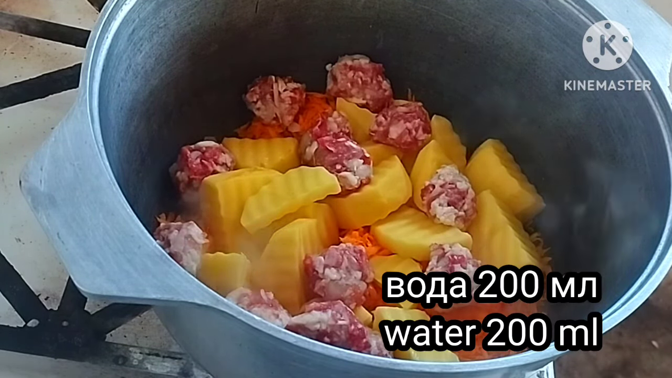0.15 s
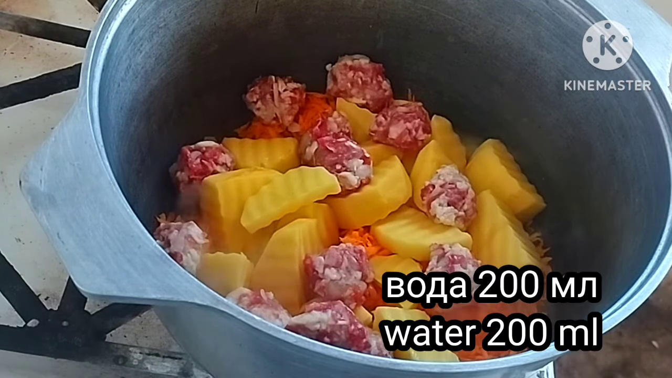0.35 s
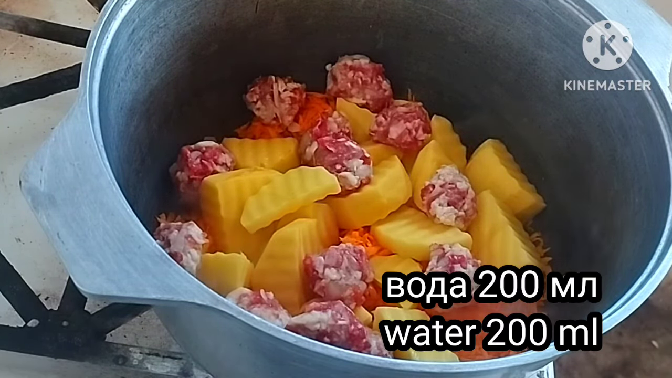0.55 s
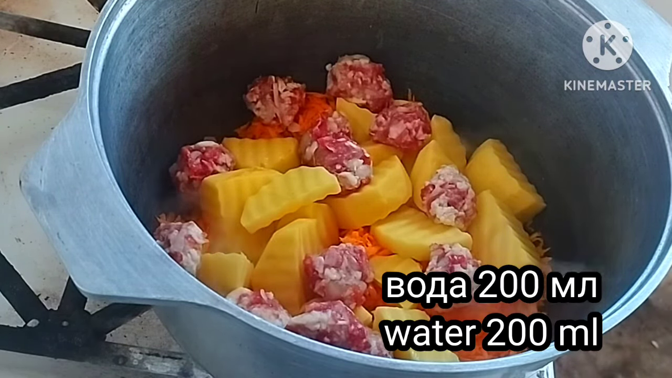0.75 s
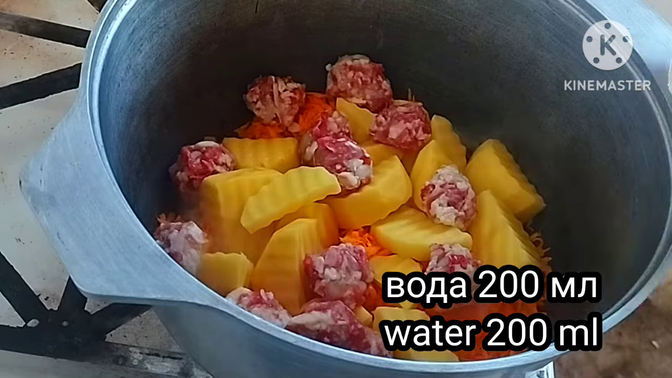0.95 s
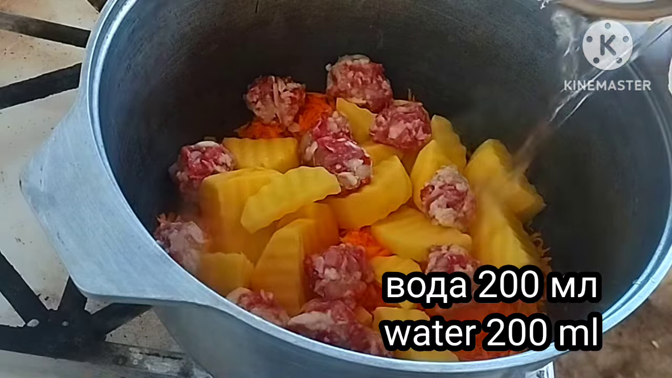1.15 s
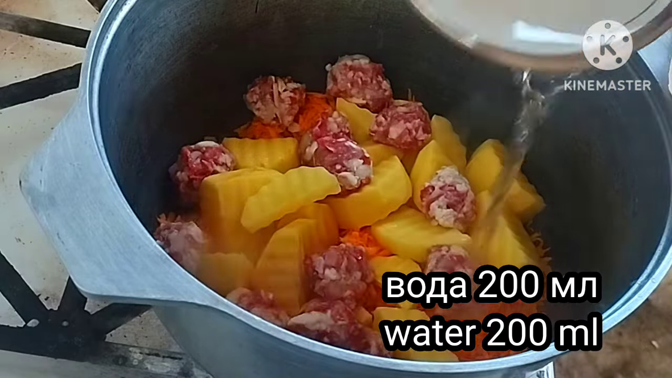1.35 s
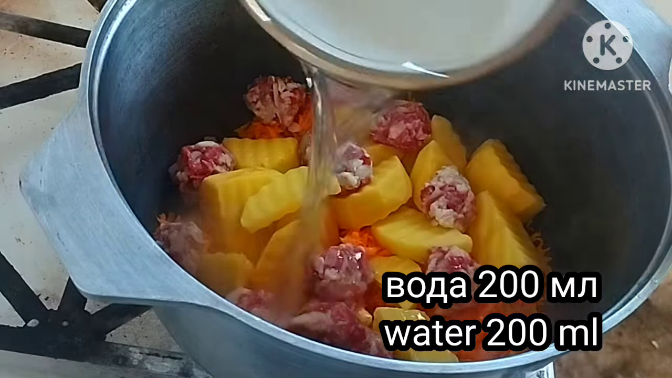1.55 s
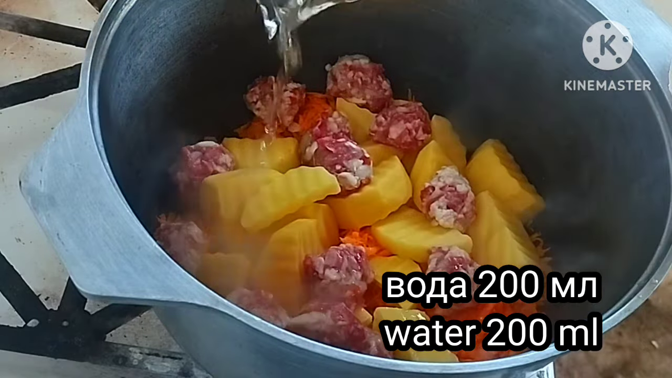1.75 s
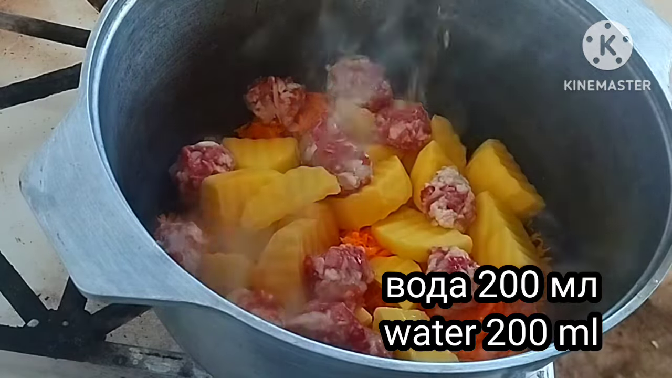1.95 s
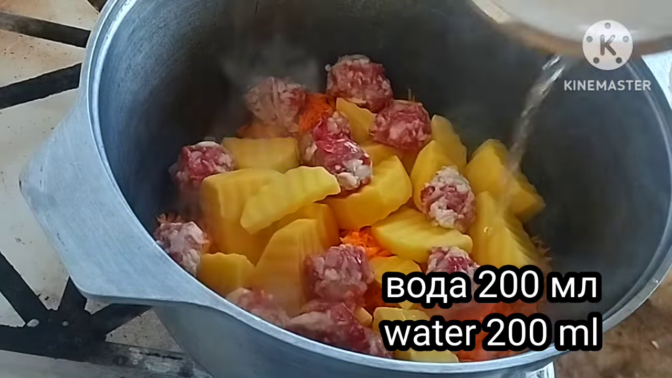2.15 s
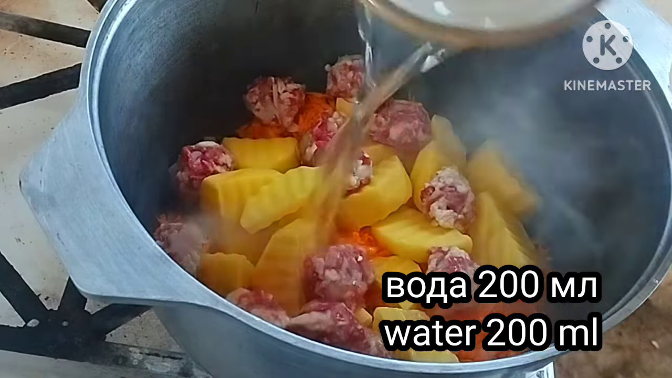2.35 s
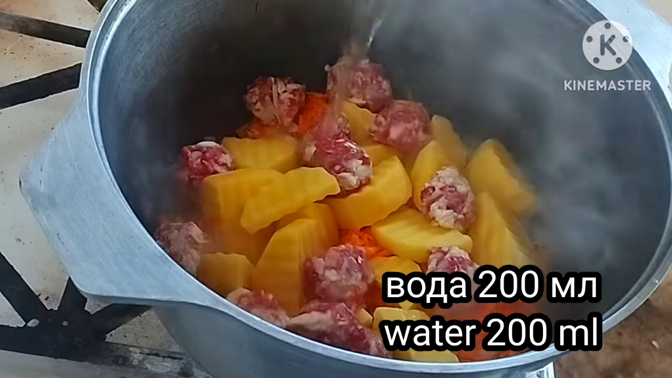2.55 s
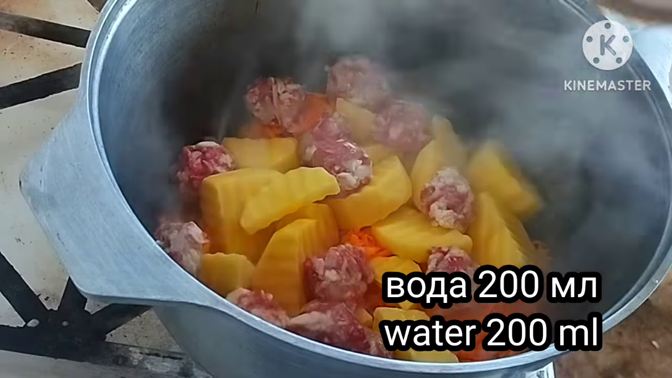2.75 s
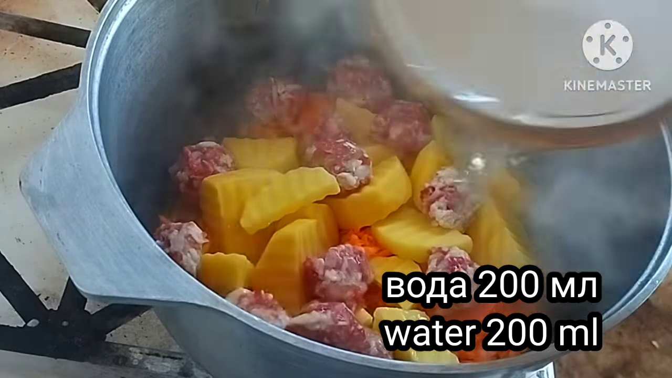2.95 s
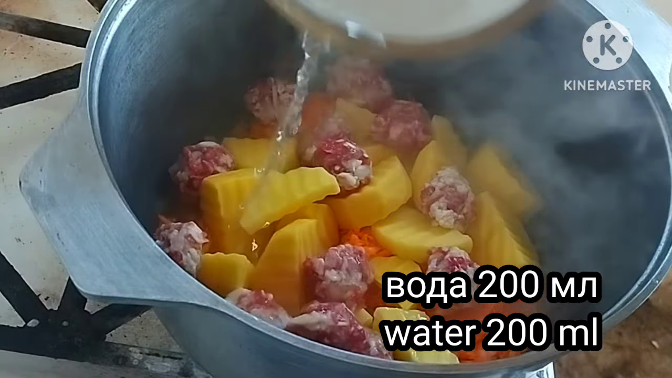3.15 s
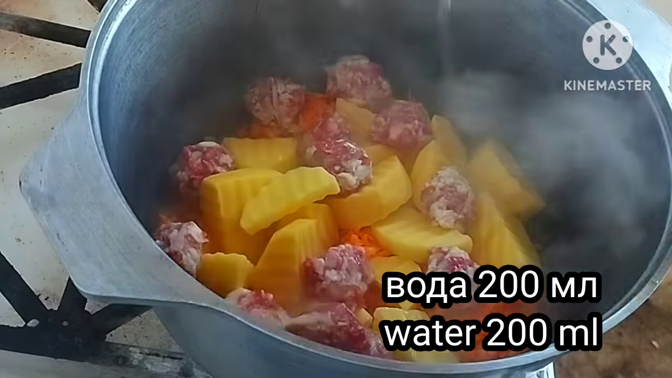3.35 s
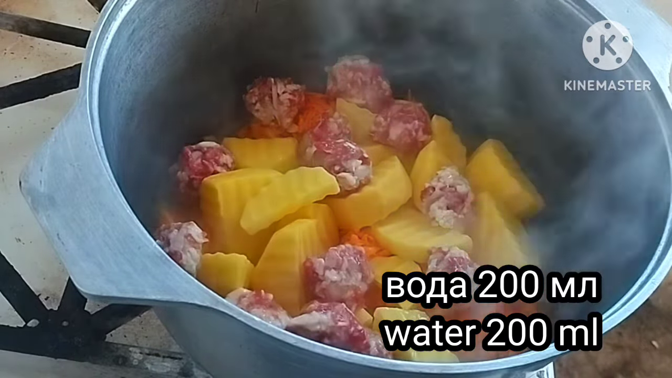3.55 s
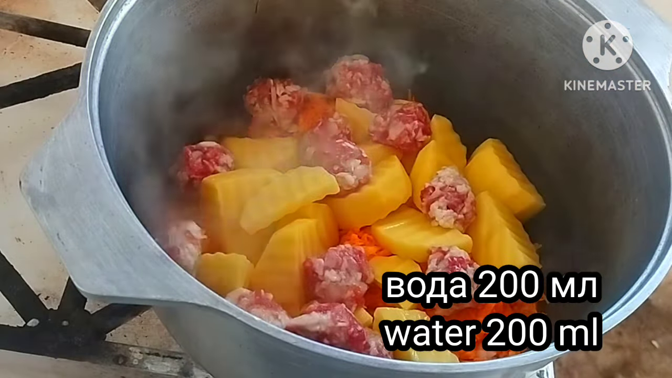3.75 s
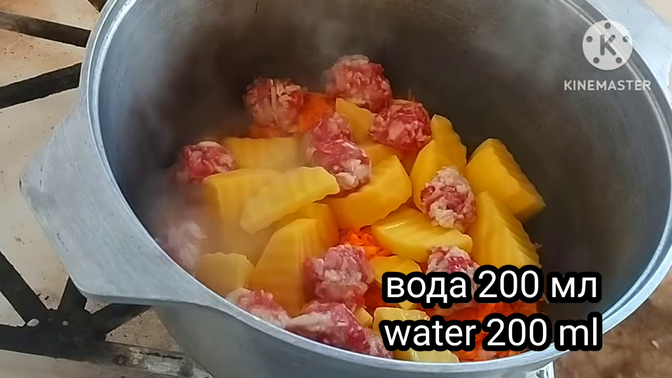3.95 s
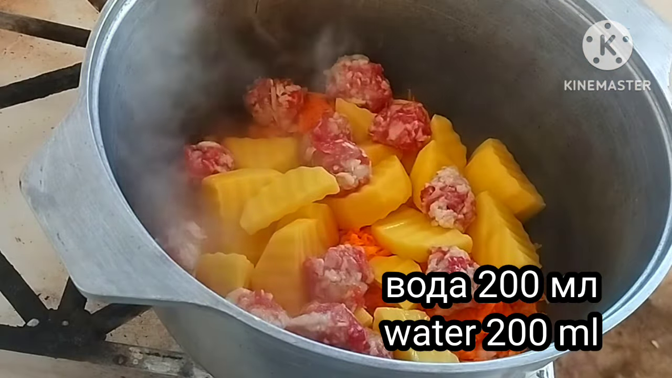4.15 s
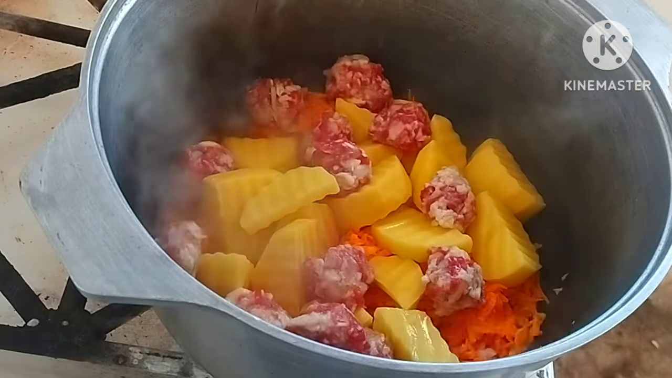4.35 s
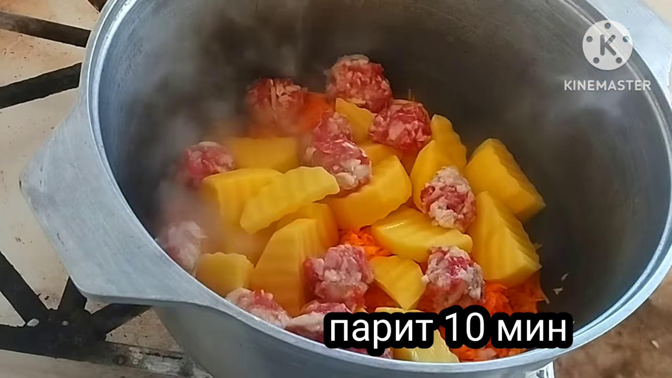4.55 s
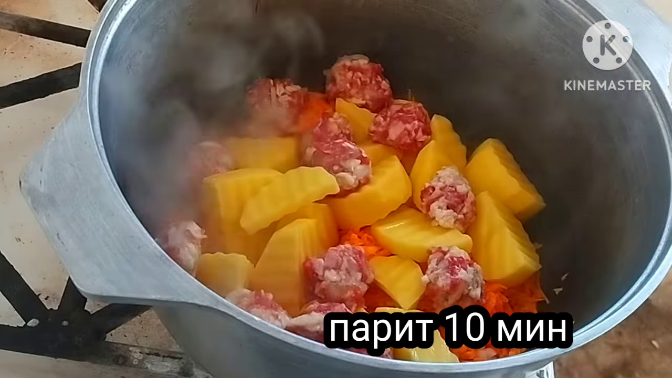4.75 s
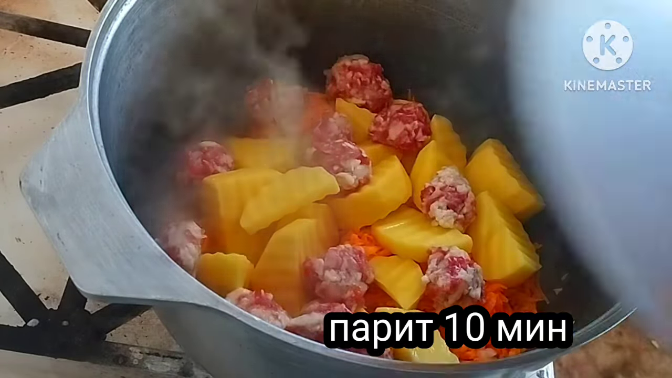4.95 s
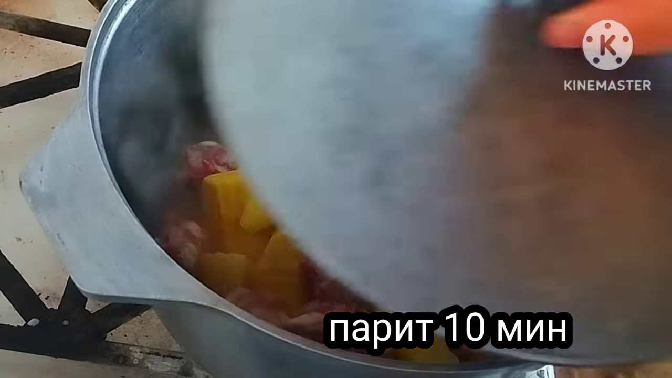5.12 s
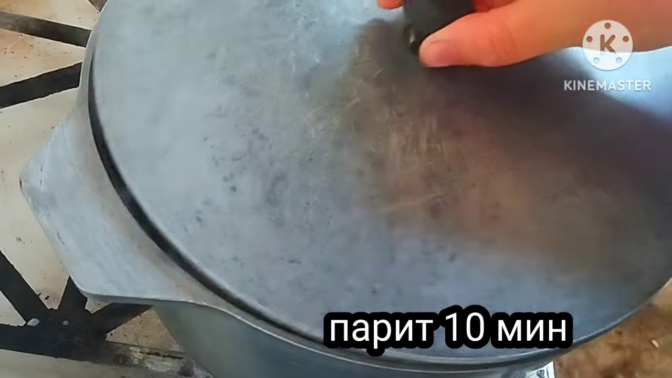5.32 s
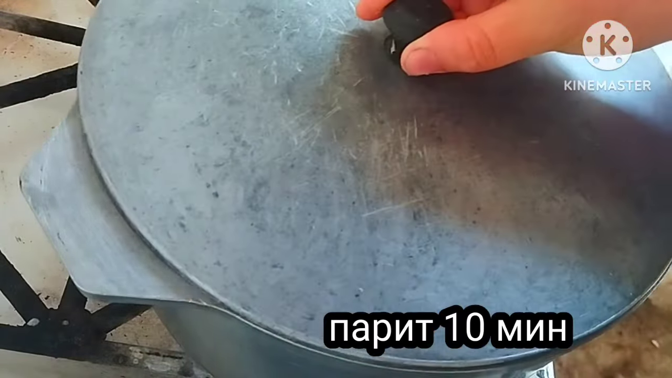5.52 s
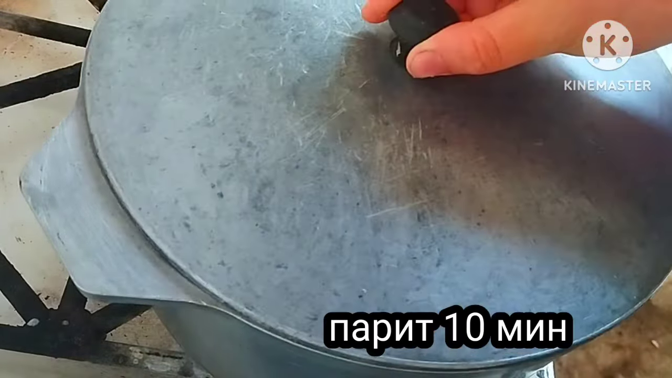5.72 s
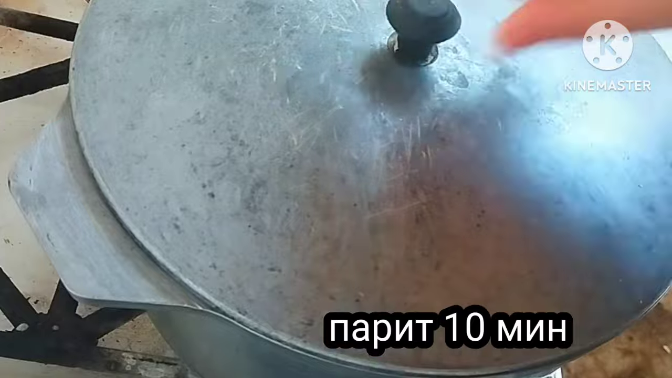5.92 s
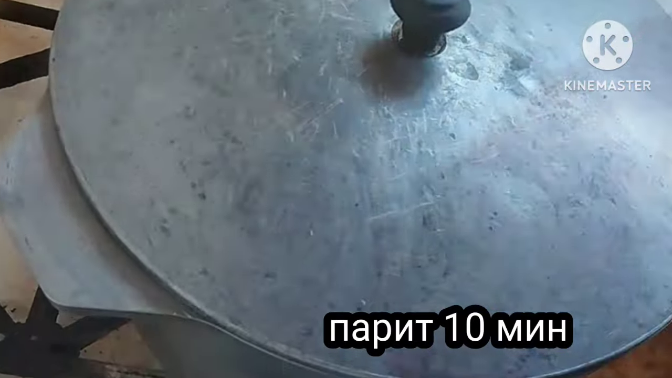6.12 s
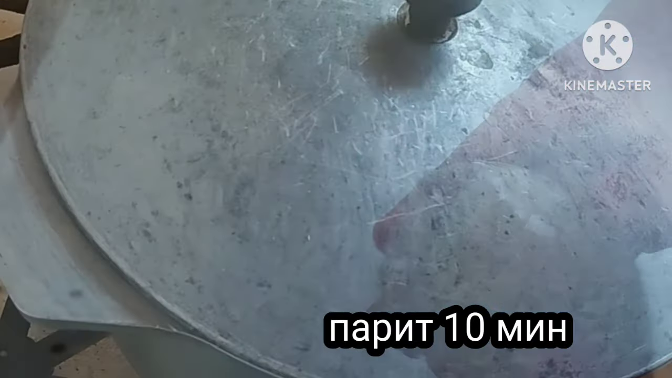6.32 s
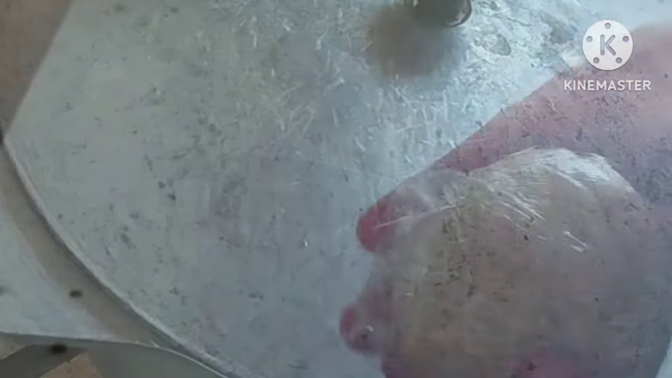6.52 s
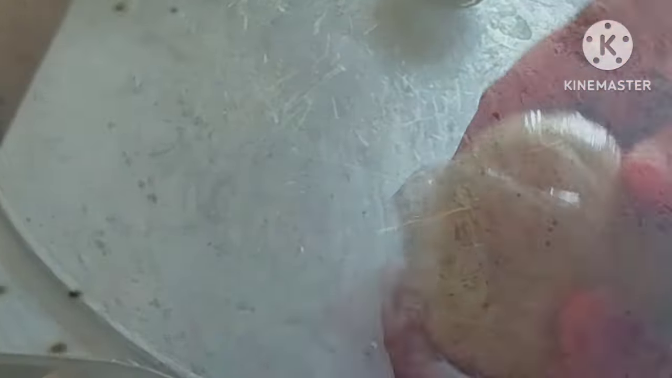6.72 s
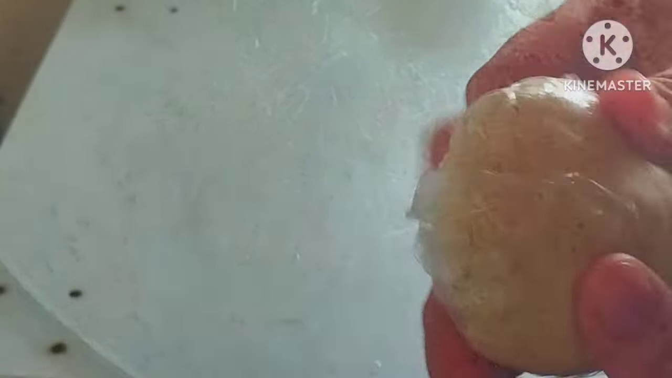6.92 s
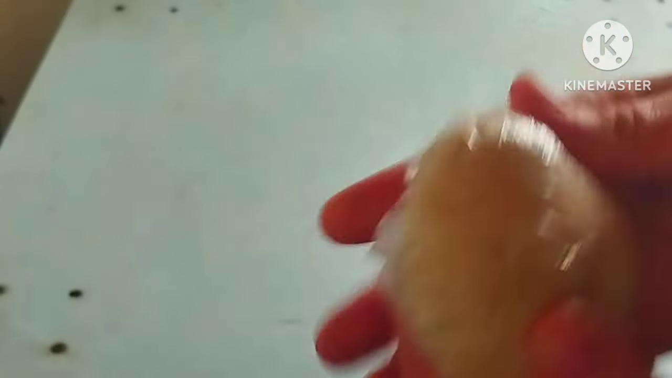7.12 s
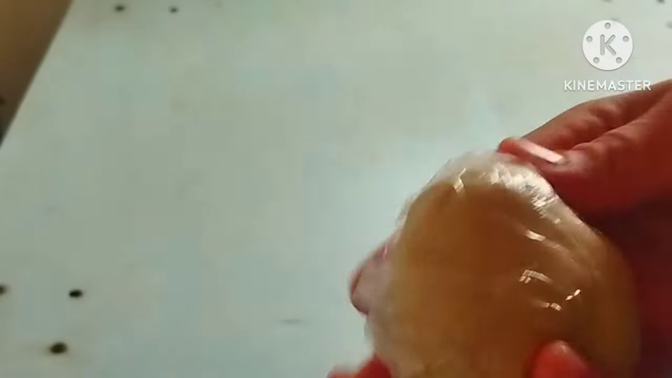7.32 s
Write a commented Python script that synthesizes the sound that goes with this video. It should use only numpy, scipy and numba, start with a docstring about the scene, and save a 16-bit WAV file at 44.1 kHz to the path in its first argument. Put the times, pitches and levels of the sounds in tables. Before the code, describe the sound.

Metal clanks and a utensil chatter beside a frying pot, poured water flares into loud crackling sizzle, settles to simmer, then a lid clanks shut.

```python
"""Meat and potatoes fry in a heavy pot: random bursts make fizz and boiling, and swept resonances the air in the pot.
Dull knocks, clanks and a chattering steel utensil come first: each blow is a crack, an echo wash and ringing modes.
Three sweeps of water then make the sizzle flare, crackle, spit and splash before it settles to a simmer.
The lid slides over, shifting the hollow tones and muffling the frying, and clanks shut. The frying and the stove's
murmur fade into a low room rumble, shaped from noise, where a stroke of fine grains is hands softly rubbing dough."""
import sys
import numpy as np
from scipy import signal
from scipy.fft import rfft, irfft, next_fast_len
from scipy.io import wavfile
from numba import njit

SR = 44100
rng = np.random.default_rng(int(sys.argv[2]) if len(sys.argv) > 2 else 0)


def digitize_waveform(pressure):
    """Quantize a signal to 16-bit integers and store it at the path in sys.argv[1].

    Rows of a 2-D input are taken as channels; values are limited to [-1, 1].
    """
    field = np.atleast_2d(pressure).T
    bounded = np.clip(field, -1, 1)
    quanta = np.round(bounded * 32767).astype(np.int16)
    wavfile.write(sys.argv[1], SR, quanta)


N = 325413
TIME = np.arange(N) / SR

# colour of the fizz under the stream, of the fizz otherwise, and of the boiling: pitch_hz, relative level_db (per Hz)
POUR_FIZZ = [(2500, -15.5), (4500, -1), (6500, -0.5), (9000, 3), (11000, 0.5), (13000, -3.5), (15500, -5)]
SIMMER_FIZZ = [(2500, -14.5), (4500, -7.5), (6000, 0.5), (9000, 2.5), (11000, 2), (13000, -1.5),
               (15500, -6)]
BOILING = [(100, -57), (210, -4.5), (300, -12.5), (450, -6), (580, -5), (750, 1.5), (1100, -5), (1450, -1),
           (2250, -2.5), (2800, 3.5), (4500, 2.5), (6500, -1), (10000, -11)]
# levels of fine fizz and coarse boiling before the surging lifts them: frying in fat, then the simmer
FAT_FIZZ_DB, FAT_BOIL_DB = -56, -59
SIMMER_FIZZ_DB, SIMMER_BOIL_DB = -49.5, -52
SIMMER_START_S, SIMMER_RISE_S, SIMMER_SAG_DB_PER_S = 3.903, 0.019, 2.5
FIZZ_ECHO, FIZZ_ECHO_T60_S = .3, .12   # short reflections off the kitchen: share and ring time
# single loud spits of fat: start_s, level_db (before a common lift and the spit filters)
SPITS = [(0.424, -23.5), (0.714, -29.5), (0.9822, -21.5), (1.283, -29), (1.308, -27), (1.364, -18),
         (1.383, -20), (1.406, -18), (1.428, -18.5), (1.46, -15.5), (1.5367, -18), (1.549, -23),
         (1.566, -31), (1.615, -19.5), (1.702, -18), (2.0093, -26), (2.075, -19), (2.18, -17), (2.254, -10),
         (2.2655, -13), (2.296, -13), (2.340, -16), (2.427, -20), (2.4616, -21), (2.788, -16),
         (3.51, -15.5), (3.72, -16), (6.859, -41.5)]
SPITS_PER_S, HOT_SPITS_PER_S = 41, 110   # usual rate; extra while hot
SPIT_OVER_DB, HOT_SPIT_DB = 14, 13   # least height over the fizz gain; extra while hot
SPIT_SNAP, SPIT_SPRAY, SPRAY_S = .8, .7, .002   # shares of snap and spray; decay of the spray
SPIT_HOLLOW = 0.79   # how strongly a spit rings the air in the pot
# air tones of the pot: open_hz, covered_hz, settled (share covered, 0-1), width_hz, open_db, covered_db
HOLLOW = [(448, 283, 0.89, 86, -3, 5), (825, 466, 1, 134, -1, 7.5), (923.6, 401, 0.87, 83, 4.5, 20.5),
          (1038, 620, 0.76, 69, -0.5, 3), (1760, 1625, 0.55, 80, 2.5, 12), (1872, 1635, .65, 100, 4, 5),
          (2810, 2900, 0.73, 210, -3.5, -2)]
SHUT_NARROWING = 0.35   # share of their width that the air tones lose once settled
# room tone by the stove, then the lower rumble: pitch_hz, relative level_db (per Hz)
STOVE_TONE = [(20, 10.5), (45, -5.5), (75, -9), (105, 3.5), (135, -9.5), (220, -6), (320, -19), (600, -9.5),
              (2000, -85), (15000, -34)]
RUMBLE = [(15, -48), (25, 3), (68, -1.5), (150, -10.5), (267, -14), (666, -29), (850, -27.5), (1050, -34),
          (1180, -25), (1350, -34), (1750, -31.5), (2500, -30), (3300, -25), (4500, -31), (6200, -27),
          (8130, -39), (13500, -33), (15500, -28)]
STOVE_DB, RUMBLE_DB = -60, -54.5

# limits of the five ranges of a blow (thud, body, clang, ring, edge): edge_hz
BLOW_EDGES = [100, 350, 1200, 3200, 7000, 13000]
# blows, before the trims of wash and modes: start_s, level_db, extra_thud_db,
# brightness_db (per range above the body), swell_s
# dull knocks beside the pot, clanks at the pot, a steel utensil chattering on it, the lid meeting the rim
KNOCKS = [(.015, -38.5, 12, -27, 0.0078), (.323, -41, 6, -26, 0.0026), (.335, -28.5, 1.5, 1.5, 0.0016),
          (.353, -37.5, -4, 3.5, .002), (.41, -43, -18, -18, 0.0051), (.737, -34.5, -3, -56, 0.0093),
          (1.052, -50.5, -9, -10, 0.007), (1.091, -52, 7, -22, 0.0037), (5.115, -43, 3, 3, 0.026),
          (5.195, -38, -2, -30, 0.027)]
CLANKS = [(.111, -30, 3.5, -2.5, 0.0017), (.123, -31, -1, -4.5, .001), (.146, -39.5, -2, -7, 0.0018)]
CLINKS = [(.1885, -32.5, 0, -0.82, 0.00086), (.1945, -32.5, 3.5, 0.11, 0.00084),
          (.205, -34.5, -2.5, -0.94, 0.00084), (.224, -52, -8, 1.6, .0005)]
LID_HITS = [(5.495, -44, -10, -3, 0.00025), (5.552, -43, 8, 0.5, 0.0019), (5.583, -46.5, -19, -3.5, 0.0016),
            (5.718, -39.5, 4, -1.2, .00077), (5.739, -46, -24, -2, 0.0011), (5.778, -54, 6, -7, 0.0007),
            (5.795, -59, 2, -5, .002), (5.811, -47, 9, -2.5, 0.00026), (5.819, -50, 9, -3.5, 0.00027)]
# colour of each kind of blow: thud_db, body_db, clang_db, ring_db, edge_db
KNOCK_COLOUR = (-9, -0.5, -11.5, -16, -21)
CLANK_COLOUR = (-3.5, -1, -0.5, 3, -1)
LID_COLOUR = (-9, 2.5, 0, 5, 0)
# modes of the things struck: pitch_hz, level_db (against the blow's level there, before trims), t60_s
WORKTOP = [(240.5, -1, 0.18), (441.4, -8, 0.32), (478, 5.5, 0.056), (541, 0, 0.13), (627, -8.5, 0.39),
           (684, -14, 0.53), (934, -2.5, 0.5), (1095, -22.5, 0.11), (1560, -4, 0.13), (1930, -18, 0.32),
           (2207, -19, .3), (7230, 1, .16)]
POT = [(146.5, -1, .32), (221, 6, .16), (398, -10, 0.38), (471, 0.5, 0.11), (548, 2, 0.2),
       (645, -2.5, 0.44), (794, -9.5, 0.36), (943, -2.5, 0.33), (1050, -0.5, 0.32), (1135, -14, .28),
       (1327, 0.5, 0.14), (1594, -1.5, 0.25), (1950, -6, .52), (2130, -19, .29), (2430, -22, .4),
       (2600, -12, .45), (3467, -13, 0.15), (3500, -1, 0.18), (3881, -7, .26), (3989, -14, 0.28),
       (4230, -7, .3)]
UTENSIL = [(506, 5, .12), (1376, 2, 0.13), (1555, 6.5, 0.12), (2072, 4.5, 0.093), (2260, -8, .1),
           (3800, 4.5, .15), (4377, 8.5, .1), (4651, -1, 0.13), (4700, 1, 0.19), (4750, -1, 0.091),
           (6540, -2.5, 0.14), (6767, -9, 0.17), (7600, -1, .15), (7850, 0, .2), (9340, -3, .15)]
LID = [(330, -9, 0.38), (398, -7, 0.2), (440, -6, 0.19), (518, -5.5, 0.3), (664, -8.5, 0.39),
       (750, -8, 0.33), (1128, -14, .25), (1605, -6, 0.2), (1680, -8, .15), (2132, -17, 0.9),
       (2573, -15, 0.4), (2859, -15, 0.55), (3150, -10, .1), (3378, -12, 0.45), (3790, -4, 0.25),
       (4100, -9, 0.27), (4235, -10, 0.27), (4468, -2, 0.26), (4550, -6, .2), (4716, -15, 0.35),
       (5518, -6, 0.25), (5985, -9.5, 0.18), (6930, -12, 0.18), (7950, -7, 0.16), (8740, -9, 0.11),
       (9771, -5, 0.085), (10270, -8, .11), (10785, -8, 0.11)]
HUMP_HZ, HUMP_SHARE = 25, .01   # half width of a mode's hump in the echoes: a base, plus a share of its pitch
# brief pitched rings of knocks and sliding contacts: peak_s, pitch_hz, level_db, half_length_s
BRIEF_RINGS = [(0.095, 690, -49.5, 0.023), (.16, 636, -32.5, 0.019), (0.167, 1060, -41, 0.021),
               (0.43, 1048, -48.5, 0.022), (0.772, 677, -48, 0.022), (5.528, 525, -50, 0.033),
               (5.595, 4468, -52, 0.012)]
# brief swells of low rumble: peak_s, level_db, half_length_s, top_hz
PUFFS = [(0.315, -53.5, 0.07, 102), (2.176, -58, 0.04, 48), (2.68, -57, 0.021, 50),
         (7.008, -55.5, 0.19, 84)]

# three sweeps of the glass: start_s, end_s, start_db (before flares and surging), trend_db_per_s
POURS = [(1.207, 1.793, -46, 12), (1.845, 2.321, -37.5, 2.5), (2.369, 3.796, -36.5, -2.5)]
POUR_ATTACK_S, POUR_RELEASE_S = 0.05, 0.065
# the sizzle flares where the stream finds bare hot metal, and sinks where it lands on food: peak_s, change_db
FLARES = [(1.42, 3), (1.54, -1.5), (1.68, 2.5), (2.12, -3), (2.185, 2), (2.26, -0.5), (2.54, 0.5),
          (3.285, 3), (3.33, -3.5), (3.755, 1.5)]
FLARE_S = 0.032   # half length
COOLING_S = 0.86   # time constant of the hot fat cooling
POUR_BOIL_DB, HOT_BOIL_DB = -6.5, -1   # boiling against the stream's fizz; change while hot
# crackle on the hot fat: level against the stream's fizz before filtering, band, share that rings the pot's air
CRACKLE_DB, CRACKLE_LOW_HZ, CRACKLE_HIGH_HZ, CRACKLE_HOLLOW = 7.5, 4100, 6000, 1.4
CRACKLES_PER_S, CRACKLE_S = 600, .002   # rate and decay of the bursts
# low thumps during the pour: start_s, level_db (before the band-pass), decay_s
THUMPS = [(2.081, -35, 0.012), (2.341, -39, .0012), (2.43, -54, 0.0049)]
THUMP_TOP_HZ = 380   # above this the thumps are dull
# steam sputters out from under the food: peak_s, pitch_hz, level_db, half_length_s
SPUTTERS = [(2.425, 2930, -44, 0.028), (2.533, 2970, -48, .035), (3.16, 2850, -47, 0.036),
            (3.284, 2830, -46.5, 0.041)]
SPUTTER_WIDTH_HZ = 240

# the lid coming over the pot: time_s, covered (share, 0-1)
COVER = [(5.0, 0), (5.15, .06), (5.3, .33), (5.44, .6), (5.53, .8), (5.72, .92), (5.82, 1)]
LID_FIZZ_LOSS_DB, LID_BOIL_LOSS_DB, LID_LOSS_POWER = 15.5, 14, 0.84   # loss when shut; growth with the cover
# the hand and the rim damp the lid: time_s, extra_decay_db_per_s
LID_DAMPING = [(5.49, 600), (5.51, 300), (5.54, 300), (5.55, 0), (5.715, 0), (5.73, 40)]
LID_HOLLOW = 0.092   # how strongly the lid's blows ring the air under it
FADE_START_S, FADE_END_S = 5.94, 7.03   # stove out, rumbling room in
# a soft rub of hands on dough: peak_s, level_db, half_length_s, low_hz, high_hz
RUB = (7.3, -62.5, 0.11, 2400, 4600)

# stereo image: pitch_hz, side_minus_mid_db; then pitch_hz, left_minus_right_db
STEREO_WIDTH = [(30, -9.5), (120, -11), (300, -12.5), (600, -10), (1100, -7), (2200, -2.5), (5500, 0),
                (8500, -2.5), (13000, 1)]
STEREO_LEAN = [(60, 1), (160, 2.5), (350, -1), (750, 2), (1500, .5), (3300, 0.3), (5500, -0.8),
               (9000, -2.5), (14000, 0)]
CUTOFF_HZ = 15750


def from_db(db):
    """Decibels to gain."""
    return 10 ** (np.asarray(db) / 20)


def rms_one(x):
    """Scale to unit power."""
    return x / np.sqrt(np.mean(x ** 2) + 1e-20)


def in_time(rows):
    """Each column of a curve at every sample."""
    s, *columns = np.transpose(rows)
    return [np.interp(TIME, s, column) for column in columns]


def since(s):
    """Seconds gone by since a moment, zero before it."""
    return np.maximum(TIME - s, 0)


def bump(peak_s, half_length):
    """A bell-shaped swell that peaks at 1."""
    return np.exp(-((TIME - peak_s) / half_length) ** 2)


def coloured(x, points):
    """Filter by a spectrum of (Hz, dB) points."""
    size = next_fast_len(N)
    hz, level = np.transpose(points)
    bins = np.maximum(np.arange(size // 2 + 1) * SR / size, 1)
    gain = from_db(np.interp(np.log(bins), np.log(hz), level))
    return irfft(rfft(x, size) * gain, size)[..., :N]


def band(x, low, high, order=2):
    """Causal band-pass."""
    sos = signal.butter(order, [low, min(high, .45 * SR)], "band", fs=SR, output="sos")
    return signal.sosfilt(sos, x + 1e-18)


def spread(pair):
    """Two unrelated signals become left and right: alike in the bass, unrelated around the upper treble."""
    mid = coloured(pair[0], [(hz, -10 * np.log10(1 + from_db(db) ** 2)) for hz, db in STEREO_WIDTH])
    side = coloured(pair[1], [(hz, -10 * np.log10(1 + from_db(-db) ** 2)) for hz, db in STEREO_WIDTH])
    return np.array([mid + side, mid - side])


def noise():
    """White noise spread over the stereo image."""
    return spread(rng.standard_normal((2, N)))


def drift(rate):
    """Random wander through the given number of knots per second, scaled to unit power."""
    knots = rng.standard_normal(N // 40)
    return rms_one(np.interp(TIME * rate, np.arange(len(knots)), knots))


def bursts(per_s, size_db):
    """Clicks of either sign at random moments, their sizes spread exponentially in dB."""
    sizes = from_db(size_db * np.minimum(rng.exponential(1, (2, N)), 4))
    sizes = sizes * rng.choice([-1, 1], (2, N))
    return sizes * (rng.random((2, N)) < per_s / SR)


def echoes(x, t60):
    """Dense short reflections, different on each side, as strong as their source."""
    t = TIME[:SR // 5]
    walls = rng.standard_normal((2, len(t))) * from_db(-60 * t / t60)
    return signal.fftconvolve(x, walls / np.sqrt(np.sum(walls ** 2) / 2), axes=1)[:, :N]


def spray(clicks, decay_s):
    """Each click lets off its own puff of noise, as strong as the click and dying fast."""
    r = np.exp(-2 / (decay_s * SR))
    power = signal.lfilter([1 - r], [1, -r], clicks ** 2 + 1e-18)
    return np.sqrt(power) * noise()


def frying():
    """Gains of fizz and boiling: fat, stream and simmer add in power, and the lid shuts them in."""
    covered, = in_time(COVER)
    shut = np.clip(covered, 0, 1) ** LID_LOSS_POWER
    stream = pouring()
    simmer_age = since(SIMMER_START_S)
    simmer = (1 - np.exp(-simmer_age / SIMMER_RISE_S)) * from_db(-SIMMER_SAG_DB_PER_S * simmer_age)
    stream_boil = stream * from_db(POUR_BOIL_DB + HOT_BOIL_DB * scalding())
    fizz = np.sqrt(from_db(FAT_FIZZ_DB) ** 2 + stream ** 2 + (simmer * from_db(SIMMER_FIZZ_DB)) ** 2)
    boil = np.sqrt(from_db(FAT_BOIL_DB) ** 2 + stream_boil ** 2 + (simmer * from_db(SIMMER_BOIL_DB)) ** 2)
    stove = 1 - faded()
    return fizz * from_db(-LID_FIZZ_LOSS_DB * shut) * stove, boil * from_db(-LID_BOIL_LOSS_DB * shut) * stove


def spitting(fizz_gain):
    """Drops explode in the fat with a snap and a spray. Gives sound and push on the pot's air."""
    hot = scalding()
    per_s = SPITS_PER_S + HOT_SPITS_PER_S * hot
    over_db = SPIT_OVER_DB + HOT_SPIT_DB * hot
    sizes = fizz_gain * from_db(over_db + 3.5 * np.minimum(rng.exponential(1, N), 2.5))
    snaps = sizes * rng.choice([-1, 1], N) * (rng.random(N) < per_s / SR)
    # random spits lean to one side; the snaps of the listed loud ones sit in the middle
    pan_db = rng.normal(0, 3.2, N)
    snaps = snaps * from_db([pan_db, -pan_db])
    for s, db in SPITS:
        snaps[:, int(s * SR)] = from_db(db + 10)   # lift ahead of the band-pass
    spits = SPIT_SNAP * snaps + SPIT_SPRAY * spray(snaps, SPRAY_S)
    return band(spits, 2400, 9500), SPIT_HOLLOW * band(spits, 770, 4000)


def sizzle():
    """Fine fizz of fat and coarser boiling of water surge together. Gives sound and push on the pot's air."""
    fizz_gain, boil_gain = frying()
    stream = pouring()
    flow = stream / stream.max()
    surge_db = 5.35 + (0.53 + 0.55 * flow) * drift(35)   # the stream makes the sizzle unsteady
    fine, coarse = bursts(12000, size_db=3.5), bursts(9000, size_db=3.5)
    fine = spread(fine + FIZZ_ECHO * echoes(fine, t60=FIZZ_ECHO_T60_S))
    poured = np.minimum(stream / (fizz_gain + 1e-9), 1) ** 2   # the stream's share of the fizz
    fizz = poured * rms_one(coloured(fine, POUR_FIZZ)) + (1 - poured) * rms_one(coloured(fine, SIMMER_FIZZ))
    boil = coloured(spread(coarse + 0.46 * echoes(coarse, t60=0.12)), BOILING)
    boil_gain = boil_gain * from_db(surge_db + 0.5 * drift(70)) / np.std(boil)
    push = from_db(-.5) * boil_gain * spread(bursts(12000, size_db=4.5))
    spits, spit_push = spitting(fizz_gain)
    return fizz * fizz_gain * from_db(surge_db) + boil * boil_gain + spits, push + spit_push


@njit
def resonate(x, hz, width, sr):
    """A two-pole resonance with a moving centre and width, and a gain of about 1 on top."""
    out = np.zeros_like(x)
    for i in range(2, len(x)):
        r = np.exp(-np.pi * width[i] / sr)
        drive = (1 - r * r) / 2 * (x[i] - x[i - 2])
        out[i] = drive + 2 * r * np.cos(2 * np.pi * hz[i] / sr) * out[i - 1] - r * r * out[i - 2] + 1e-18
    return out


def hollow(x):
    """The air in the pot rings; most of its tones sink, and all narrow and stand out more as the lid closes."""
    covered, = in_time(COVER)
    out = 0
    for open_hz, shut_hz, settled, open_width, open_db, shut_db in HOLLOW:
        closing = np.minimum(covered / settled, 1)
        hz = open_hz + (shut_hz - open_hz) * closing
        width = open_width * np.clip(1 - SHUT_NARROWING * closing, .1, 1)
        waver_db = 1.3 * (1 - closing) * drift(9)
        gain = from_db(open_db + (shut_db - open_db) * closing + waver_db)
        # a second, broad pass keeps the valleys between the tones dark
        tone = [resonate(resonate(side, hz, width, SR), hz, 5 * width, SR) for side in x]
        out = out + gain * np.array(tone)
    return out


def room_tone():
    """The stove's low murmur of flame gives way to a deeper rumble, both shaped from noise."""
    stove = from_db(STOVE_DB) * rms_one(coloured(noise(), STOVE_TONE))
    rumble = from_db(RUMBLE_DB) * rms_one(coloured(noise(), RUMBLE))
    return (1 - faded()) * stove + faded() * rumble


def mode_humps(modes, hump_db):
    """Echoes carry the colour of the thing struck: a (Hz, dB) spectrum with a hump at each mode."""
    grid = np.geomspace(100, 13000, num=700)
    humps = sum(from_db(db + hump_db) ** 2 / (1 + ((grid - hz) / (HUMP_HZ + HUMP_SHARE * hz)) ** 4)
                for hz, db, t60 in modes)
    return np.column_stack([grid, 10 * np.log10(1 + humps)])


def blows(hits, colour_db, modes, lowest_hz, wash_t60s, wash_db, hump_db, modes_db, lesser_db, lesser_t60,
          crack_db, damping=((0, 0),)):
    """Each blow is a crack, a dense wash of kitchen echoes, and the modes of the thing struck."""
    centres = np.sqrt(np.multiply(BLOW_EDGES[:-1], BLOW_EDGES[1:]))
    t = TIME[:SR * 3 // 5]
    echo = coloured(noise(), mode_humps(modes, hump_db))
    edges = [min(lowest_hz, 300), *BLOW_EDGES[1:]]
    washes = [rms_one(band(echo, low, high, order=3)) for low, high in zip(edges, edges[1:])]
    # a crowd of lesser modes lies between the strong ones
    lesser_hz = rng.uniform(900, 12000, size=70)
    lesser = np.column_stack([lesser_hz, rng.normal(lesser_db, 1.6, size=70), np.full(70, lesser_t60)])
    hz, db, t60 = np.vstack([modes, lesser]).T
    rings = np.exp(np.outer(2j * np.pi * hz - np.log(1000) / t60, t))
    lost_db = np.cumsum(in_time(damping)[0]) / SR
    out = np.zeros((2, N))
    for s, hit_db, thud_db, bright_db, swell in hits:
        steps_above_body = np.maximum(np.arange(len(centres)) - 1, 0)
        levels = hit_db + np.array(colour_db) + bright_db * steps_above_body
        levels[0] += thud_db
        start = int(s * SR)
        span = slice(start, start + len(t))
        # a sliding contact builds up over some milliseconds; pressure on the rim damps the ringing
        shape = (1 - np.exp(-t / max(swell, 1e-4))) * from_db(lost_db[start] - lost_db[span])
        hardness = np.sqrt(0.0013 / max(swell, 1e-4))   # the more sudden the contact, the louder its crack
        crack = from_db(crack_db) * hardness * np.exp(-t / 0.0058)
        for wash, level, wash_t60 in zip(washes, levels, wash_t60s):
            decay = from_db(-60 * t / wash_t60) + crack
            out[:, span] += wash[:, span] * from_db(level + wash_db) * shape * decay
        mode_levels = np.interp(np.log(hz), np.log(centres), levels) + db + modes_db
        strength = from_db(mode_levels + rng.normal(0, 1, (2, len(hz))))
        # short waves reach the two sides out of step
        phase = rng.uniform(-np.pi, np.pi, len(hz)) * np.minimum(hz / 1300, 1)
        phase = phase + rng.normal(0, 1, (2, len(hz))) * np.minimum(hz / 1300, 2)
        out[:, span] += shape * ((strength * np.exp(1j * phase)) @ rings).imag
    return out


def knocks():
    """Dull knocks beside the pot ring the modes of the worktop."""
    return blows(KNOCKS, KNOCK_COLOUR, WORKTOP, lowest_hz=195, wash_t60s=[0.31, 0.2, 0.27, 0.39, 0.16],
                 wash_db=-4.5, hump_db=0, modes_db=-1.0, lesser_db=-15.0, lesser_t60=0.28, crack_db=-26)


def brief_rings():
    """Brief pitched rings of knocks and sliding contacts: sines that swell and fade with a slight waver."""
    return sum(np.sqrt(2) * from_db(db) * bump(s, length) * np.sin(2 * np.pi * hz * TIME + 1.1 * drift(88))
               for s, hz, db, length in BRIEF_RINGS)


def clanks():
    """Blows on the heavy pot ring its modes."""
    return blows(CLANKS, CLANK_COLOUR, POT, lowest_hz=122, wash_t60s=[0.22, 0.33, 0.44, 0.3, 0.19],
                 wash_db=-6.0, hump_db=6, modes_db=0.0, lesser_db=-16.0, lesser_t60=0.21, crack_db=-29)


def clinks():
    """A chattering steel utensil rings its own modes and the pot's together."""
    return blows(CLINKS, CLANK_COLOUR, POT + UTENSIL, lowest_hz=118, wash_t60s=[0.038, 0.21, 0.29, 0.25, 0.065],
                 wash_db=-2.5, hump_db=2.5, modes_db=-3.0, lesser_db=-14.0, lesser_t60=0.22, crack_db=-22)


def puffs():
    """Brief swells of low-passed rumble, cut from one bed of noise."""
    white = noise()
    return sum(from_db(db) * bump(s, length) * rms_one(band(white, 24, top_hz))
               for s, db, length, top_hz in PUFFS)


def pouring():
    """Strength of the sizzle under the stream: each sweep sets in, swells or sags, and dies when the stream breaks."""
    sweeps = 0
    for start, end, db, trend in POURS:
        level = from_db(db + trend * np.minimum(since(start), end - start))
        attack = 1 - np.exp(-since(start) / POUR_ATTACK_S)
        sweeps = sweeps + level * attack * np.exp(-since(end) / POUR_RELEASE_S)
    return sweeps * from_db(sum(db * bump(s, FLARE_S) for s, db in FLARES))


def scalding():
    """1 when the first water meets the hot fat, falling towards 0 as the fat cools."""
    first_s = POURS[0][0]
    return (TIME > first_s) * np.exp(-since(first_s) / COOLING_S)


def crackle():
    """Water flashes to steam on the hottest fat in coarse, sharp bursts. Gives sound and push on the pot's air."""
    pops = rms_one(spray(bursts(CRACKLES_PER_S, size_db=3.5)[0], CRACKLE_S))
    pops = pops * from_db(CRACKLE_DB) * pouring() * scalding()
    return band(pops, CRACKLE_LOW_HZ, CRACKLE_HIGH_HZ), CRACKLE_HOLLOW * band(pops, 1550, 1860)


def splashes(level_db, per_s, sharpness):
    """The stream traps small bubbles between the pieces of food; each rings on one of 24 pitches."""
    born = bursts(per_s, size_db=5.0) * np.sqrt(pouring())
    pitches = np.geomspace(420, 4800, num=24)
    dealt = rng.integers(0, len(pitches), N)
    rings = 0
    for k, hz in enumerate(pitches):
        b, a = signal.iirpeak(hz, sharpness, fs=SR)
        rings = rings + signal.lfilter(b, a, born * (dealt == k) + 1e-18) * (hz / 1000) ** -.2
    return from_db(level_db) * rms_one(spread(rings))


def thumps():
    """Each thump is a sudden low push that dies away, softened by a band-pass."""
    pushes = sum(from_db(db) * (TIME > s) * np.exp(-since(s) / decay) for s, db, decay in THUMPS)
    return band(pushes, 8.4, THUMP_TOP_HZ)


def sputters():
    """Steam forces its way out from under the food in short, pitched runs of tiny bursts."""
    pops = spread(bursts(1900, size_db=-1))
    half_width = SPUTTER_WIDTH_HZ / 2
    return sum(from_db(db) * bump(s, length) * rms_one(band(pops, hz - half_width, hz + half_width))
               for s, hz, db, length in SPUTTERS)


def lid_hits():
    """The lid meets the rim and rings its modes, damped by the hand and the rim."""
    return blows(LID_HITS, LID_COLOUR, LID, lowest_hz=110, wash_t60s=[1.0, 0.45, 0.4, 0.33, 0.1],
                 wash_db=-6.5, hump_db=12.5, modes_db=2.0, lesser_db=-21, lesser_t60=0.19, crack_db=6.0,
                 damping=LID_DAMPING)


def faded():
    """Progress 0-1 of the fade from the stove to the rumbling room."""
    return np.clip(since(FADE_START_S) / (FADE_END_S - FADE_START_S), 0, 1)


def rub():
    """Skin slides over dough in one stroke of fine, dense grains."""
    s, db, length, low_hz, high_hz = RUB
    grains = rms_one(band(spread(bursts(6000, size_db=3.0)), low_hz, high_hz))
    return from_db(db) * bump(s, length) * grains


def scene():
    """Frying, knocks, clanks, water, lid and room, summed."""
    fry, fry_push = sizzle()
    pops, pop_push = crackle()
    lid = lid_hits()
    air = hollow(fry_push + pop_push + LID_HOLLOW * band(lid, 280, 960))
    stove = fry + air + room_tone()
    contacts = knocks() + brief_rings() + clanks() + clinks() + lid
    water = pops + splashes(level_db=-65.5, per_s=550, sharpness=51) + sputters()
    return stove + contacts + water + puffs() + thumps() + rub()


def record(dry):
    """Left and right lean slightly by pitch; a partial dip sits near 13.8 kHz, and the top is cut."""
    left = coloured(dry[0], [(hz, db / 2) for hz, db in STEREO_LEAN])
    right = coloured(dry[1], [(hz, -db / 2) for hz, db in STEREO_LEAN])
    pair = np.array([left, right])
    notched = signal.lfilter(*signal.iirnotch(13800, 9, fs=SR), pair)
    dipped = pair + 0.77 * (notched - pair)
    return signal.sosfilt(signal.ellip(12, .1, 80, CUTOFF_HZ, fs=SR, output="sos"), dipped)


dry = scene()
out = record(dry)
digitize_waveform(out)
```